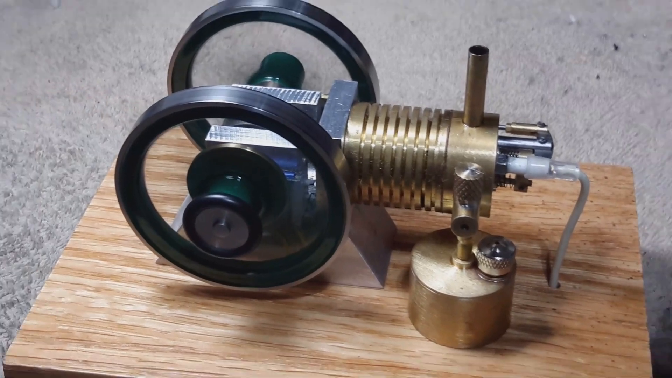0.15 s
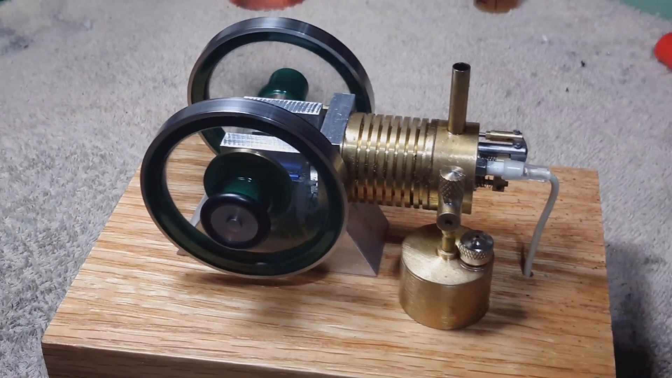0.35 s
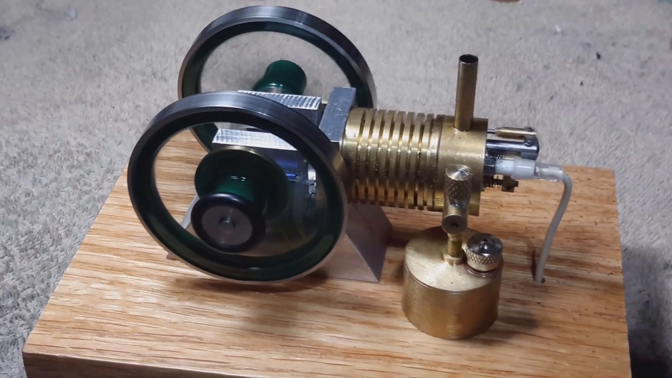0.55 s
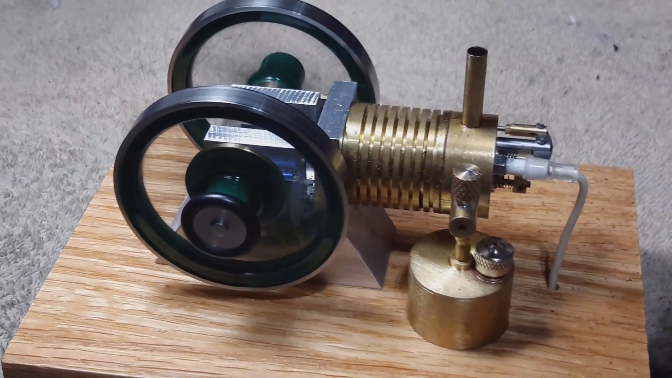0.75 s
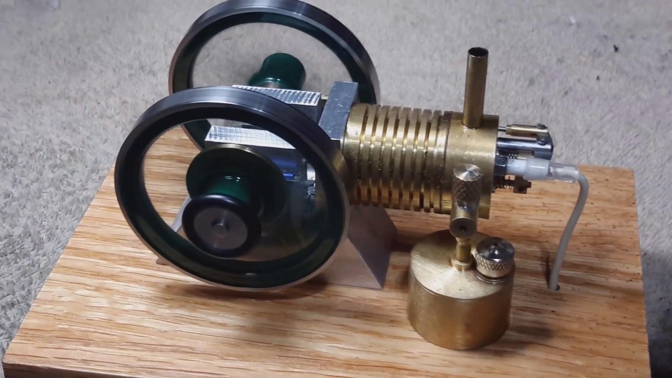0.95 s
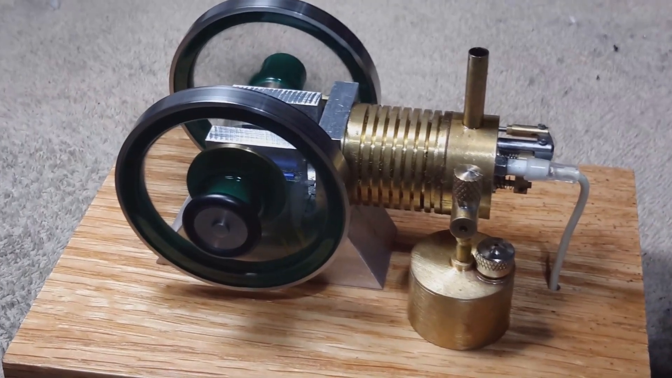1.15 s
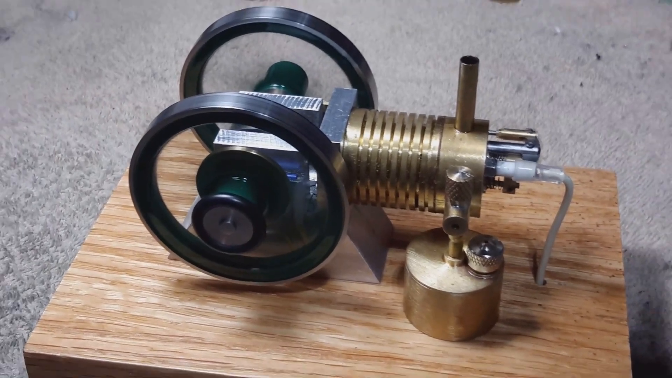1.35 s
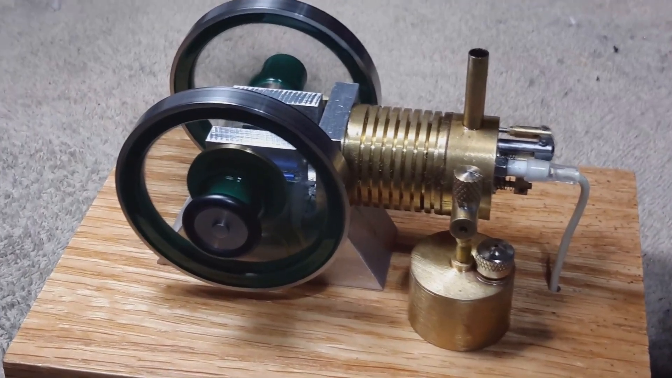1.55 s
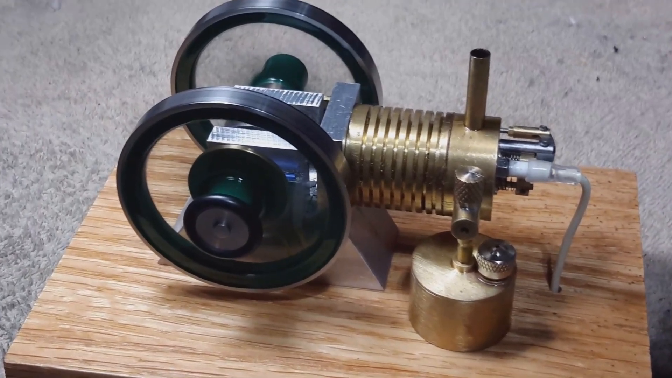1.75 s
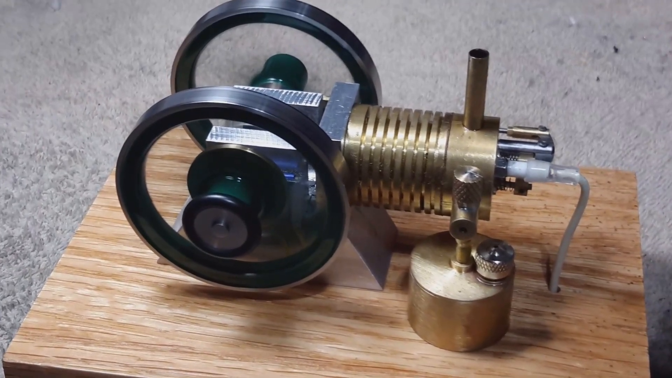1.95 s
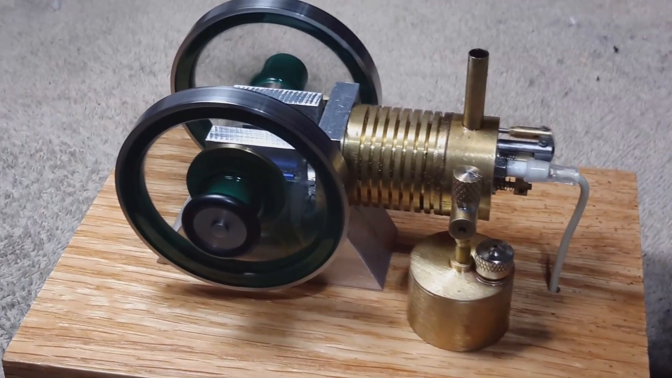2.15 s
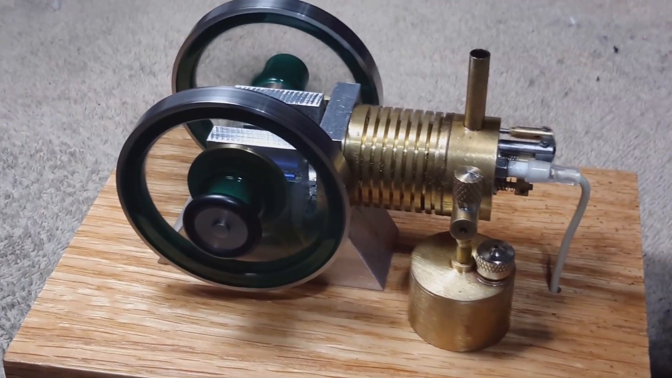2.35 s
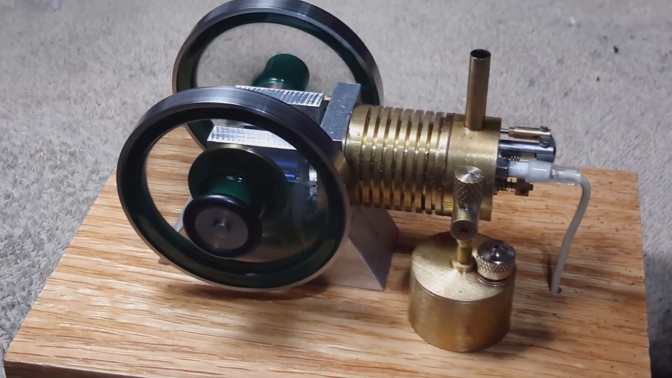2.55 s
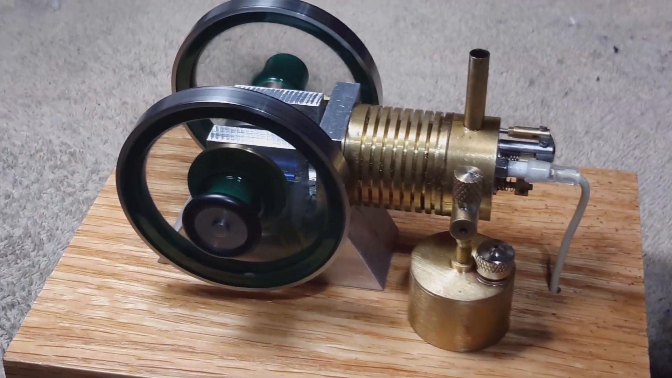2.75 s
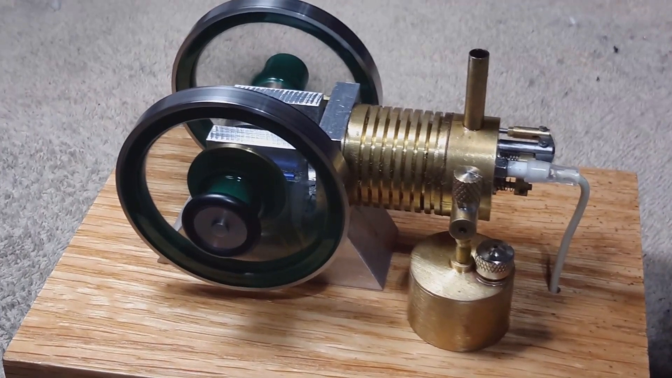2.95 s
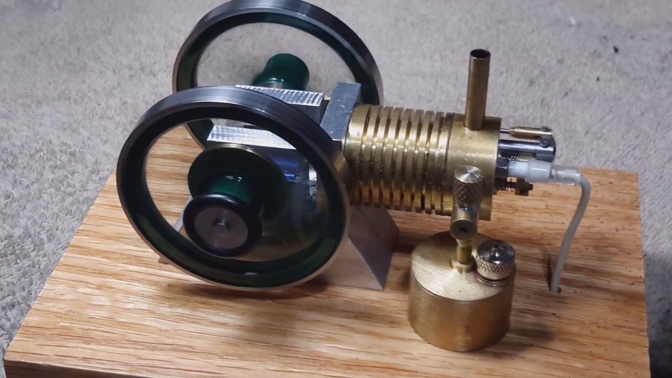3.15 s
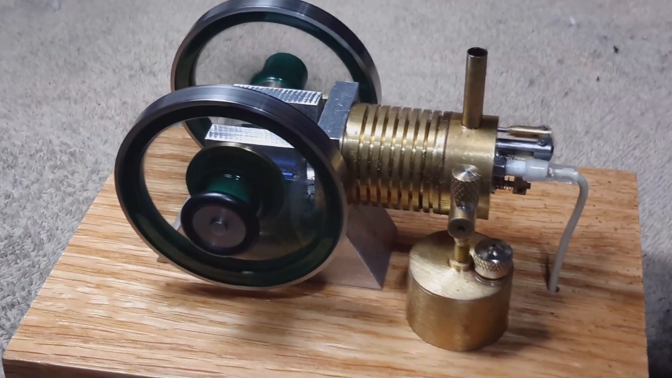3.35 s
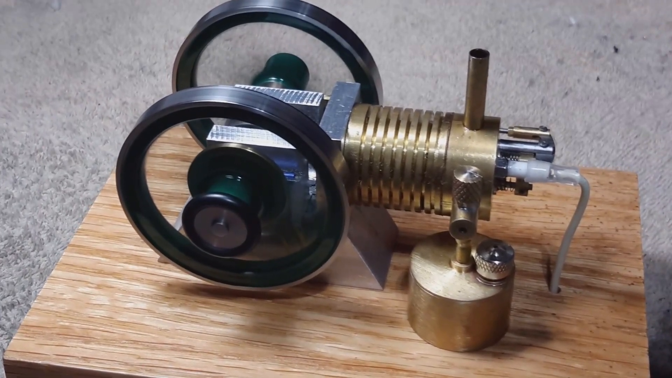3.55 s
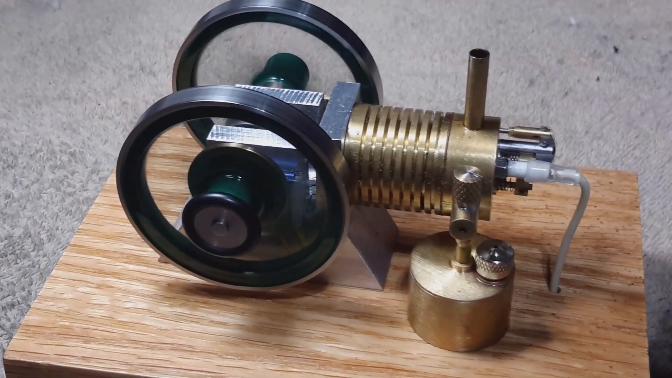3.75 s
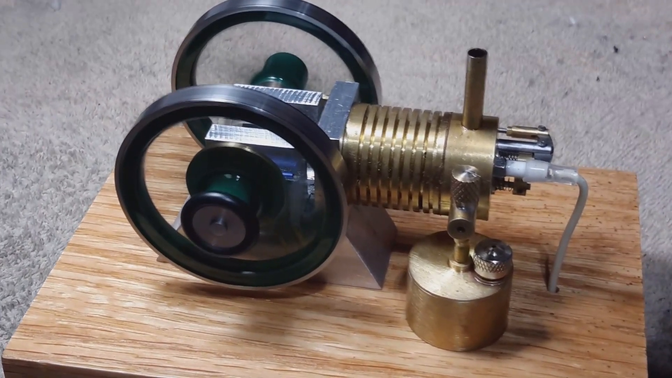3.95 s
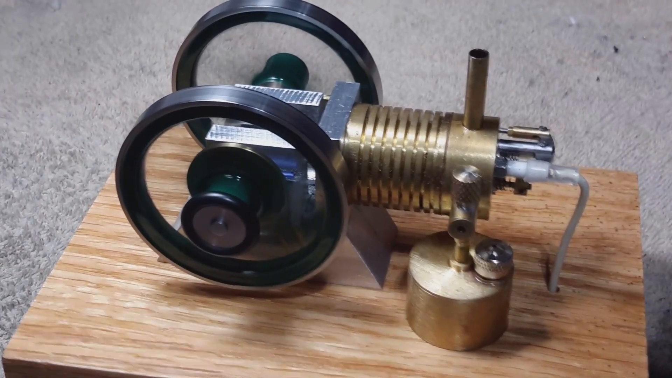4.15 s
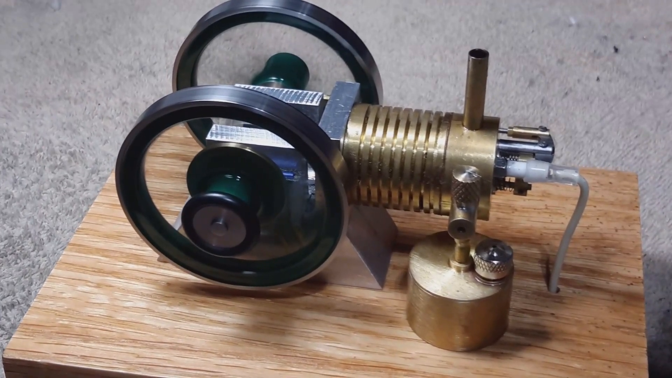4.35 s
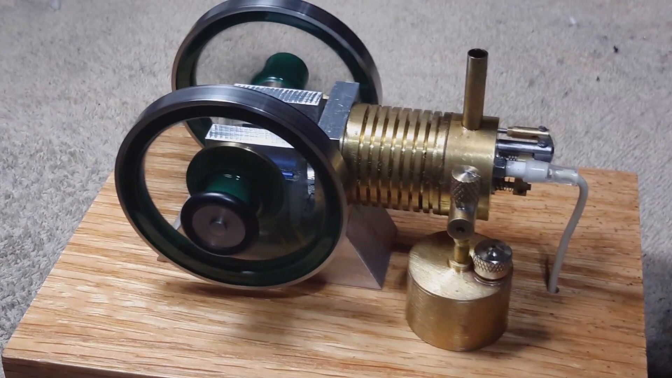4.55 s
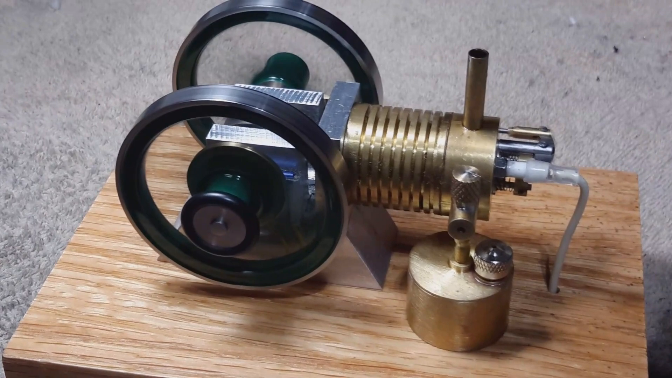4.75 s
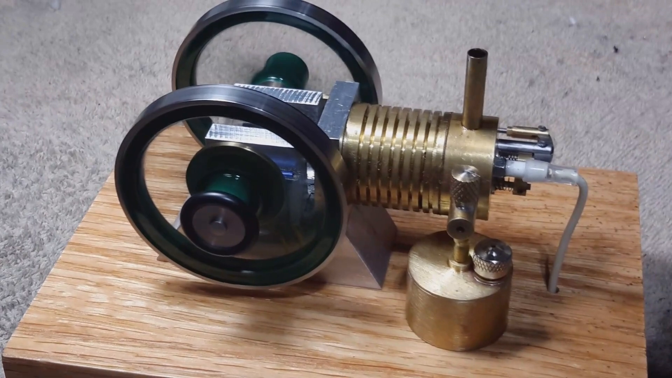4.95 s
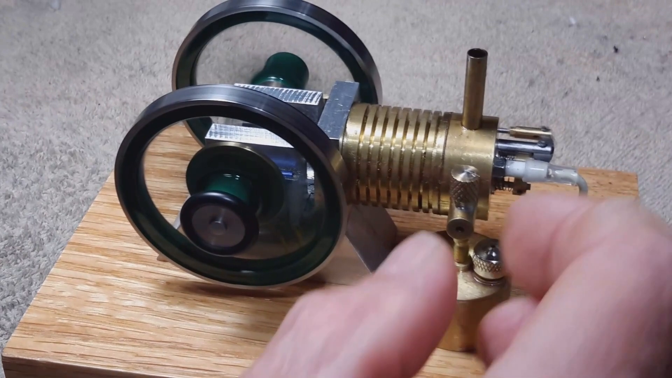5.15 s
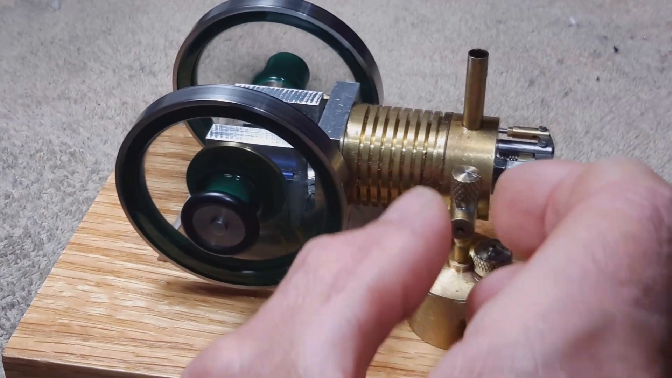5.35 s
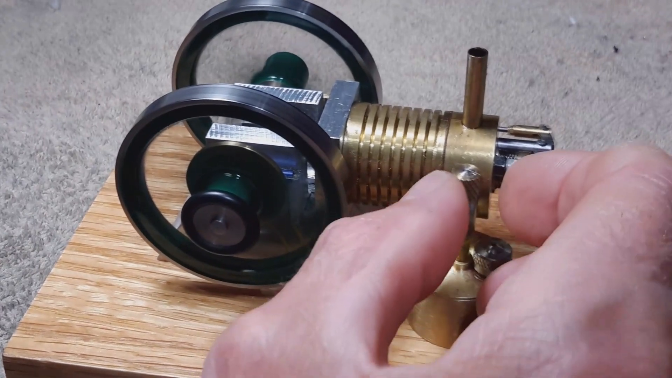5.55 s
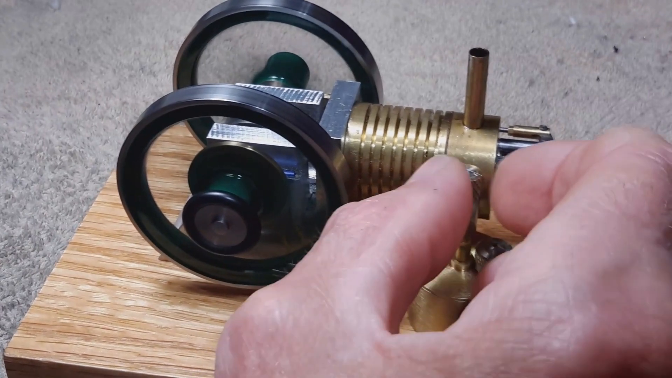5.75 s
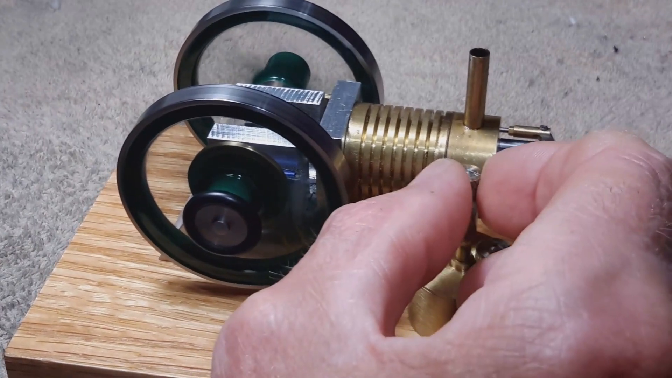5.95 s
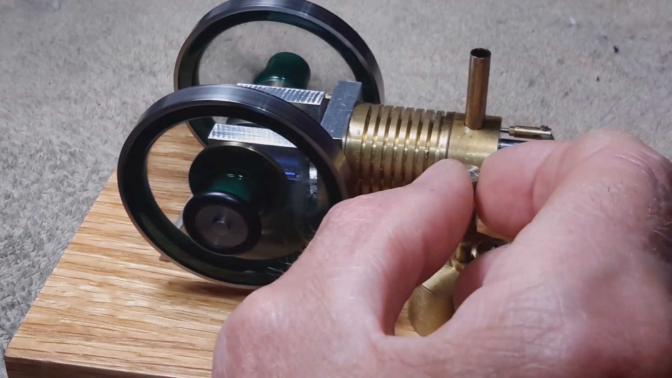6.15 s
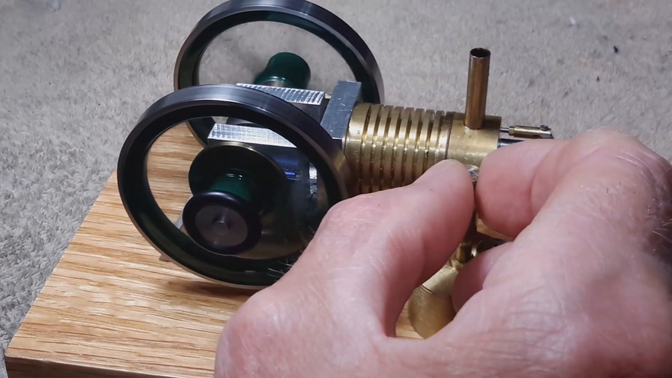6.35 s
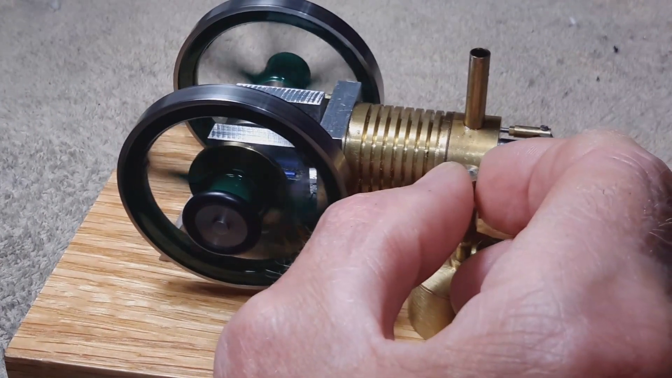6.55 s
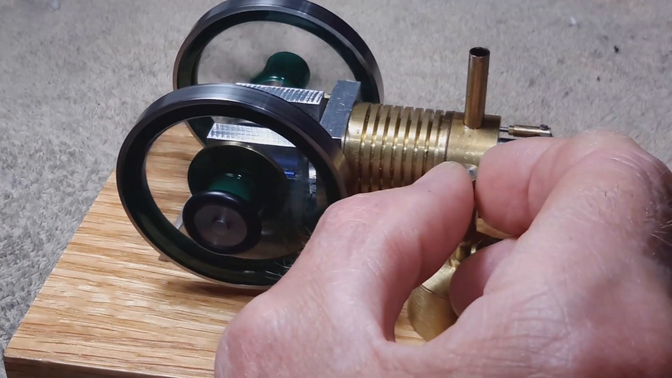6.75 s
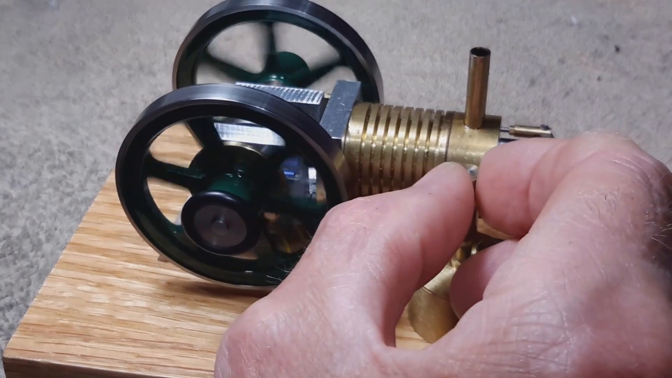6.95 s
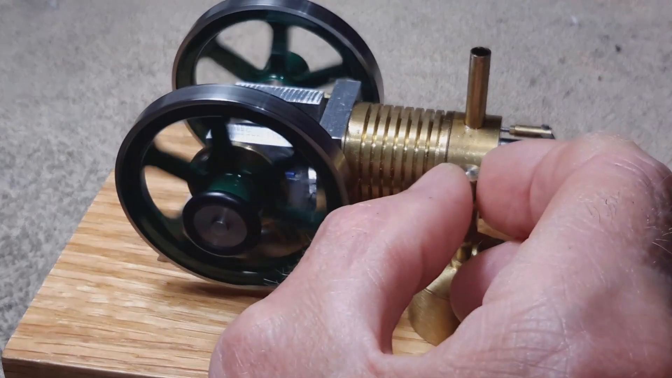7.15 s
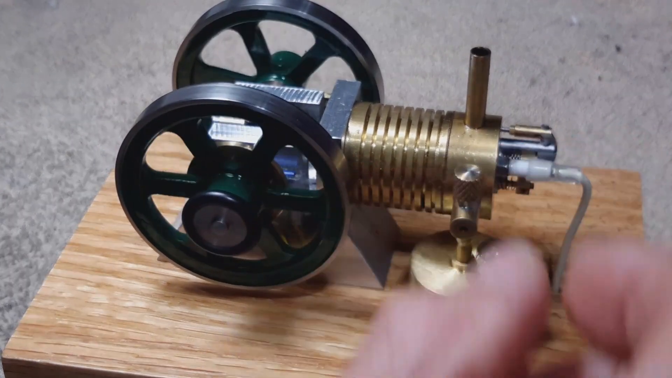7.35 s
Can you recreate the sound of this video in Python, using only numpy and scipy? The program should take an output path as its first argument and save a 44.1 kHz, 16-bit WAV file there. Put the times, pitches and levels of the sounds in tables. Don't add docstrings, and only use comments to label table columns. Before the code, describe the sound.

Dry, bright mechanical rattling from a tiny brass hit-and-miss engine, already running. Uneven pops arrive several times a second between unfired turns full of valve clicks, fluttering intake gulps and loose gear chatter. Late on, a cupped hand adds a hollow colour; the firing ends and the flywheels quickly lose speed, rocking back and forth with small isolated ticks. Close microphone, short workshop reflections, faint low room rumble.

```python
import sys
import numpy as np
from scipy import signal
from scipy.fft import rfft, irfft, next_fast_len
from scipy.io import wavfile
from scipy.ndimage import uniform_filter1d

SR = 44100
rng = np.random.default_rng(int(sys.argv[2]) if len(sys.argv) > 2 else 0)


def invert_db(x):
    u = np.asarray(x, float) / 20
    return 10 ** u


def output_pcm(signal):
    pcm = np.clip(np.atleast_2d(signal).T, -1, 1) * 32767
    wavfile.write(sys.argv[1], SR, np.round(pcm).astype(np.int16))


N = 326340

TIME, SIZE = np.arange(N) / SR, next_fast_len(N + SR // 2)
HZ = np.arange(SIZE // 2 + 1) * SR / SIZE
LAST_TURN_END_S = 6.641
FIRES_ABOVE_DB = -25
SLOW_TURN_S = 0.1


def ring(x, modes):
    gain = 0
    for k, (f, width, db) in enumerate(modes):
        resonance = 1j * HZ * width / (f * f - HZ ** 2 + 1j * HZ * width)
        gain = gain + (-1) ** k * invert_db(db) * resonance
    return irfft(rfft(x, SIZE) * gain, SIZE)[:N]


def add(track, s, shape):
    i = int(s * SR)
    if 0 <= i < N - len(shape):
        track[i:i + len(shape)] += shape


def burst(ms, grain_db, rise=0.34, tail_db=-17, tail_ms=6):
    t = np.arange(1200) / SR * 1000
    grain = invert_db(grain_db * np.minimum(rng.exponential(size=1200), 4))
    swell = 1 - np.exp(-t / ms / rise)
    decay = np.exp(-t / ms) + invert_db(tail_db) * np.exp(-t / tail_ms)
    ticks = rng.standard_normal(1200) * grain * swell * decay
    return ticks / np.sqrt(uniform_filter1d(ticks ** 2, size=44).max())


def push(ms, suction):
    t = np.arange(400) / SR / (ms / 1000)
    wave = np.sin(2 * np.pi * t ** .75) * (t < 1)
    return np.where(wave < 0, suction * wave, wave)


def coast(span_s, count, last):
    kept, friction = .9537, 28.16
    energy = [np.linspace(150, 500, 400)]
    for _ in range(count - 1):
        energy.append(np.maximum(kept * energy[-1] - friction, 1))
    lengths = np.array(energy) ** -.5
    lengths[0] *= .9724
    lengths[-1] *= 1 if last else 1.0134
    return [np.interp(-span_s, -lengths.sum(axis=0), row) for row in lengths]


# t/s, valve lift level/dB, pipe pop level/dB
FIRINGS = [(-0.265, -9, -22), (0.045, -9, -22), (0.3481, -8, -23), (0.658, -9, -21.5), (0.88, -8.5, -21),
           (1.0177, -6, -22.5), (1.2317, -7.5, -19.5), (1.4442, -4.5, -20), (1.6525, -4, -21),
           (2.0304, -8, -23.5), (2.2534, -7, -20.5), (2.388, -8, -22), (2.784, -7.5, -23.5),
           (3.0292, -9, -23.5), (3.1776, -8.5, -23), (3.5106, -9, -23.5), (3.7516, -8.5, -22.5),
           (4.094, -9, -24.5), (4.3346, -9, -24), (4.6625, -9, -22.5), (4.9986, -8.5, -23.5),
           (5.2434, -9, -23.5), (5.5747, -7.5, -23), (5.7241, -6.5, -18.5), (5.8695, -8, -20),
           (6.0109, -9, -22)]
TURNS_PER_FIRING = [4, 4, 4, 3, 2, 3, 3, 3, 5, 3, 2, 5, 3, 2, 4, 3, 4, 3, 4, 4, 3, 4, 2, 2, 2, 6]
# valve lift level/dB, pipe pop level/dB
MISSED_TURNS = [
    (-13, -30.5),
    (-13.5, -28.5),
]


def cam_turns():
    slow_db_per_s, scatter_db = -54, (1.25, 1.0)
    ends = [row[0] for row in FIRINGS[1:]] + [LAST_TURN_END_S]
    turns, ago = [], []
    for (s, db, pop_db), end, count in zip(FIRINGS, ends, TURNS_PER_FIRING):
        lengths = coast(end - s, count=count, last=end == LAST_TURN_END_S)
        chance = np.clip(rng.standard_normal((count, 2)), -2, 2) * scatter_db
        starts = s + np.cumsum(lengths) - lengths
        for k, start in enumerate(starts):
            softer_db = slow_db_per_s * max(lengths[k] - SLOW_TURN_S, 0)
            missed = MISSED_TURNS[k > 1] + chance[k] + softer_db
            turns.append((start, *(missed if k else (db, pop_db))))
            ago.append(min(k, 2))
    return turns, ago


def cam_angle(cam):
    starts = np.append([turn[0] for turn in cam], LAST_TURN_END_S)
    turns = np.interp(TIME, starts, np.arange(len(starts)))
    fired = np.append([turn[2] > FIRES_ABOVE_DB for turn in cam], 0)
    return turns % 1, fired[turns.astype(int)], np.diff(starts)


# position [share of turn], level/dB
TAPPET = [
    (.252, -19.5),
    (.272, -19.5),
    (.266, -18.5),
]
SNORT = [
    (.29, -18.5),
    (.335, -11.5),
    (.345, -15),
]
SEAT = [
    (.6, -17.5),
    (.622, -16),
    (.636, -17.5),
]


def cam_knocks(cam, ago):
    scatter_db, scatter_share = (1.5, 2, 3.5), (.004, 0.0083, .005)
    early_per_s = (.37, .08, .22)
    starts = np.array(cam)[:, 0]
    lengths = np.diff(np.append(starts, LAST_TURN_END_S))
    slow = np.maximum(lengths - SLOW_TURN_S, 0)
    chance = np.clip(rng.standard_normal((len(cam), 3, 2)), -2, 2)
    for k, rule in enumerate((TAPPET, SNORT, SEAT)):
        share, db = np.array(rule)[ago].T
        share = share - early_per_s[k] * slow + scatter_share[k] * chance[:, k, 0]
        yield list(zip(starts + share * lengths, db + scatter_db[k] * chance[:, k, 1]))


# length [ms], swell [share of length], trim level/dB
KNOCKS = [
    (1.98, 1, 2.5),
    (0.22, 0.94, 0.5),
    (1.33, 1, 0.33),
    (0.62, 1, -1.5),
]
# f/Hz, width/Hz, then level/dB for lift, tappet, snort, seat
BODY = [(770, 600, -14.5, -39, -23, -6), (1802, 314, -6.5, -28, -4.5, -3), (2200, 485, -10.5, 0, -39, -3),
        (2973, 460, -8.5, -30, 0, -38), (3710, 335, -7, -60, -5.5, -35),
        (4360, 554, -11.5, -9, -10.5, -3.5), (7695, 766, 1, 5.5, -3, 1), (8230, 400, 4, -12, 5, 9.5),
        (8560, 366, 3, -15, 3.5, -26), (10100, 2750, -7, -2, -8.5, -27),
        (12300, 11000, -17.5, -6, -28, -10), (15430, 220, -9.5, -6, -8, 6.5)]
# f/Hz, width/Hz, level/dB
CRACK = [(1810, 5200, -24.5), (3940, 950, -2.5), (8200, 600, -3.5), (10000, 2000, -4), (14400, 1900, -1)]


def valve_gear(cam, ago):
    lifts = [(s, db - 5.3 * (pop_db > FIRES_ABOVE_DB)) for s, db, pop_db in cam]
    all_hits = (lifts, *cam_knocks(cam, ago))
    knocks, crack = 0, np.zeros(N)
    for k, (hits, (ms, rise, trim_db)) in enumerate(zip(all_hits, KNOCKS)):
        track = np.zeros(N)
        for s, db in hits:
            add(track, s - .0002, invert_db(db + trim_db) * burst(ms, 2.5, rise))
        knocks = knocks + ring(track, np.array(BODY)[:, [0, 1, 2 + k]])
    for s, db, _ in FIRINGS:
        add(crack, s + 0.00065, invert_db(db + 4.0) * burst(0.56, 0.83, tail_db=-22.5))
    return invert_db(4) * knocks + ring(crack, CRACK)


def rims_singing(clatter):
    return ring(clatter, [(8600, 21, -7.0), (8150, 55, -15), (3235, 115, -5.0)])


# f/Hz, width/Hz, level/dB
PIPE = [(180, 154, 4), (369, 56, 2), (520, 40, -1), (810, 110, -33), (118.5, 12, -1), (148, 45, -15),
        (272, 50, -18)]
# f/Hz, width/Hz, level/dB
BASE = [(186, 65, 5), (490, 90, -9), (113, 25, -9), (330, 70, -15), (675, 70, -12)]
# t/s, level/dB
PUFFS = [
    (6.538, -40),
    (6.5413, -33),
    (6.675, -37),
    (7.063, -44),
]


def pipe(cam, angle, fired, lengths):
    air, pops = np.zeros(N), np.zeros(N)
    chance = rng.standard_normal((len(cam), 8, 2))
    for (s, _, pop_db), length, draw in zip(cam, lengths, chance):
        hot = pop_db > FIRES_ABOVE_DB
        if hot:
            add(pops, s + .00005, invert_db(pop_db) * push(2.3, 1.4))
        else:
            add(air, s + 0.049 * length, invert_db(pop_db + 4.5) * push(2.35, 0.37))
        shares = .3 + np.cumsum(.052 + 0.00905 * draw[:, 0])
        sizes_db = -32 + 3 * hot - 9 * ((shares - .44) / 0.12) ** 2 + 2.0 * draw[:, 1]
        sizes_db = sizes_db - 35 * max(length - .09, 0)
        for share, db in zip(shares, sizes_db):
            add(air, s + share * length, invert_db(db) * push(1.415, 1.7))
    for s, db in PUFFS:
        add(air, s, invert_db(db + 0.5) * push(2.8, 0.65))
    stroke = np.exp(-((angle - .42) / 0.091) ** 2) * invert_db(0.42 * fired) + 0.048 * (angle > 0)
    length_now = np.interp(TIME, np.array(cam)[:, 0], lengths)
    stroke = stroke * invert_db(-80 * np.maximum(length_now - SLOW_TURN_S, 0))
    hiss_modes = [(276, 240, -0.5), (858, 430, -1.0), (1775, 340, 1.5), (2910, 1700, -9.5)]
    hiss = ring(stroke * rng.standard_normal(N), hiss_modes)
    thump = pops + sum(ring(pops, [mode]) for mode in BASE)
    return thump + 0.4 * air + ring(air, PIPE) + invert_db(-21) * hiss


# t/s, level/dB
GEARS = [
    (0, -36),
    (2.5, -36.5),
    (6.1, -37),
    (6.35, -42),
    (6.53, -52),
    (6.68, -70),
    (7.4, -88),
]
# t/s, half length [s], level/dB
SCUFFS = [
    (6.768, 0.016, -42),
    (6.85, 0.016, -53.5),
    (6.895, 0.01, -58),
    (7.149, 0.0045, -59),
]


def gears(angle):
    hush = 1
    for s, _, _ in FIRINGS:
        hush = hush - 0.38 * np.clip(1 - (s - TIME) / 0.088, 0, 1) * (TIME < s)
    turn_db = np.interp(angle, [0, .3, .5, .7, 1], [4, 4, 4, 2, -1])
    busy = invert_db(turn_db + np.interp(TIME, *np.transpose(GEARS))) * hush
    for s, half, db in SCUFFS:
        busy = busy + invert_db(db) * np.exp(-((TIME - s) / half) ** 2)
    teeth = rng.random(N) < 260 / SR
    teeth = teeth * invert_db(2 * np.minimum(rng.exponential(size=N), 3)) * (angle < .72)
    teeth = np.convolve(teeth, np.exp(-np.arange(90) / 22))[:N]
    ticks = rng.standard_normal(N) * (1 + 2.8 * teeth)
    modes = [*np.array(BODY)[:10, :3], (12600, 3500, -13), (15300, 900, -19)]
    return ring(ticks * busy, modes) / ring(ticks, modes).std()


# t/s, level/dB, low body level/dB, pipe puff level/dB
ROCKING = [(6.6618, -13, -15, -39.5), (6.7098, -20.5, -12.5, -52), (6.7473, -42, -8, -60),
           (6.769, -35, -15, -54), (6.7964, -40, -11, -54), (6.819, -33, -20, -61), (6.8815, -41, -13, -65),
           (6.9047, -37, -16, -64), (6.9237, -17, -17.5, -50), (6.9571, -20.5, -18, -51),
           (7.001, -47, -14, -66), (7.029, -43, -20, -64), (7.0392, -19.5, -16, -49),
           (7.0952, -27.5, -11.5, -51.5), (7.1866, -25.5, -13.5, -60), (7.2678, -28, -15, -61),
           (7.325, -49, -16, -72), (7.3647, -32.5, -12, -71)]


def rocking():
    high, low, puff = np.zeros((3, N))
    for s, db, low_db, puff_db in ROCKING:
        tick = burst(0.67, 1.7, tail_db=-12.5, tail_ms=4.6)
        add(high, s, invert_db(db + 3.0) * tick)
        add(low, s, invert_db(db + low_db + 18) * tick)
        add(puff, s, invert_db(puff_db + 16) * tick)
    brass = np.array(BODY)[6:10, :3]
    frame = [(1780, 530, -4.5), (2250, 400, -2.5), (3750, 670, -4.5),
             (5170, 830, -12.0), (12500, 5600, -13), (15400, 500, -25)]
    return ring(high, brass) + ring(low, frame) + ring(puff, [(397, 310, 4), (950, 300, 5.2)])


# t/s, level/dB of its hollow
HAND = [
    (0, -30),
    (5.2, -24),
    (5.5, -3),
    (6.5, -3),
    (7.4, -9),
]


def hand_hollow(engine):
    hollow = ring(engine, [(1030, 210, -1), (1600, 460, -9.5), (2020, 240, 1.2)])
    return hollow * invert_db(np.interp(TIME, *np.transpose(HAND)))


def echoes(x, t60_s, db, dull_hz):
    t = TIME[:SR // 2]
    tail = rng.standard_normal(len(t)) * np.exp(-np.log(1000) * t / t60_s) * (t > .004)
    tail = signal.sosfilt(signal.butter(5, dull_hz, fs=SR, output="sos"), tail)
    return invert_db(db) * signal.fftconvolve(x, tail / np.sqrt(np.sum(tail ** 2)))[:N]


# f/Hz, level/dB per Hz
ROOM = [(18, -32), (30, -13.5), (221, 21), (2060, -3), (2480, -18), (3670, -6), (6050, -29), (7870, -36),
        (16000, -43)]


def workshop():
    hz, db = np.transpose(ROOM)
    colour = invert_db(np.interp(np.log(HZ + 1), np.log(hz), db))
    tone = irfft(rfft(rng.standard_normal(SIZE)) * colour, SIZE)[:N]
    rumble = ring(rng.standard_normal(N), [(45, 28, -3.0), (161, 88, -3.0)])
    return tone / tone.std() * invert_db(-68.5) + rumble / rumble.std() * invert_db(-64)


def scene():
    cam, ago = cam_turns()
    angle, fired, lengths = cam_angle(cam)
    clatter = valve_gear(cam, ago) + rocking()
    engine = clatter + rims_singing(clatter) + pipe(cam, angle, fired, lengths) + gears(angle)
    engine = engine + hand_hollow(engine)
    mix = engine + echoes(engine, t60_s=0.17, db=-12.5, dull_hz=10900) + workshop()
    return mix[None]


def top_cut(x):
    return signal.sosfilt(signal.butter(12, 16970, fs=SR, output="sos"), x)


def record(dry):
    x = signal.sosfilt(signal.butter(2, 88, "high", fs=SR, output="sos"), dry)
    cut = signal.sosfiltfilt(signal.ellip(8, .1, 50, 15900, fs=SR, output="sos"), x)
    mix = cut + invert_db(-39.5) * (x - cut)
    return top_cut(mix)


dry = scene()
out = record(dry)
output_pcm(out)
```